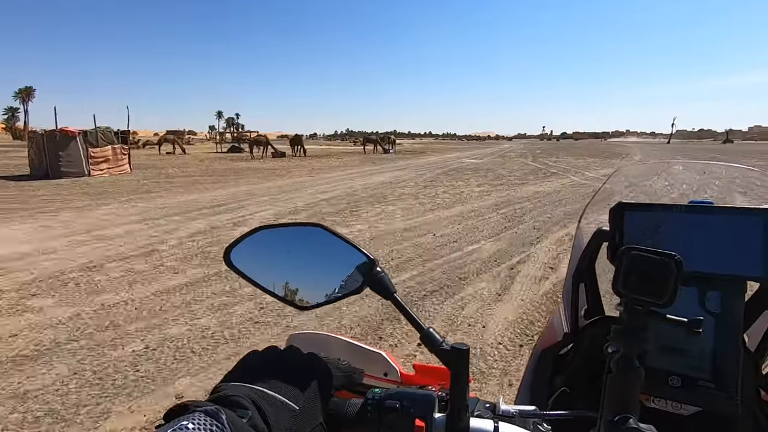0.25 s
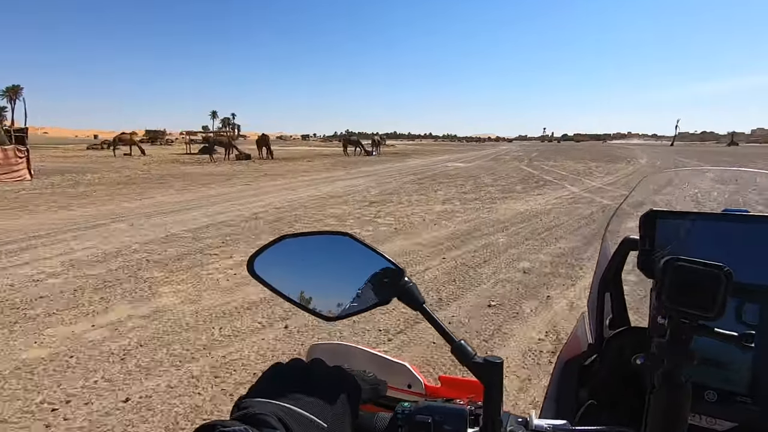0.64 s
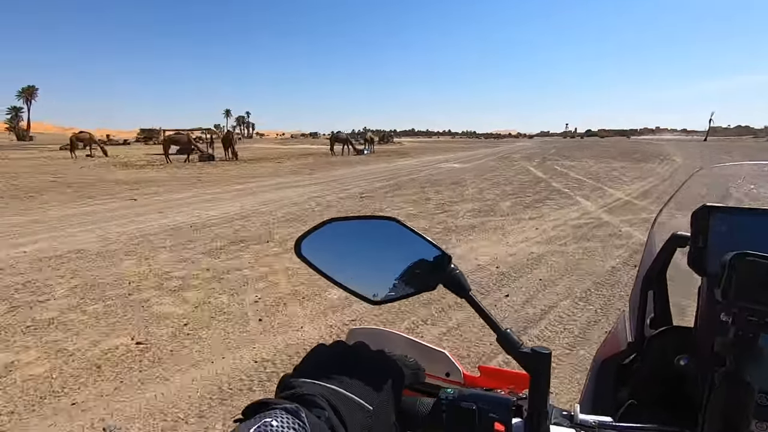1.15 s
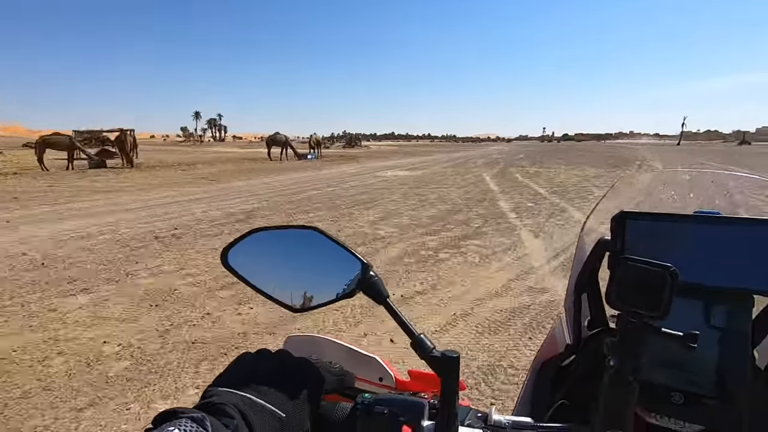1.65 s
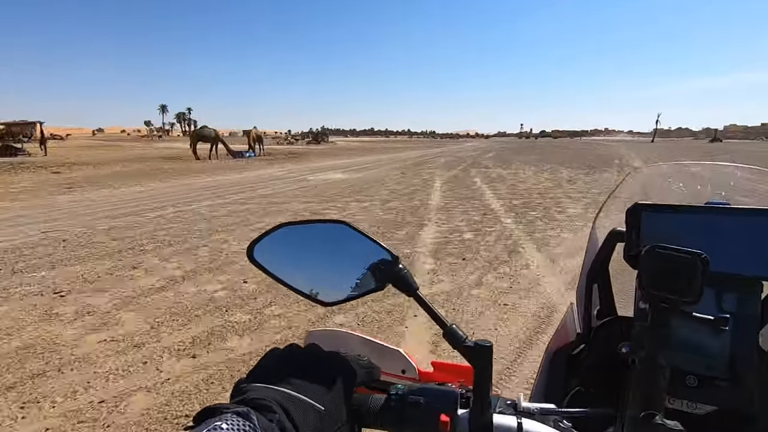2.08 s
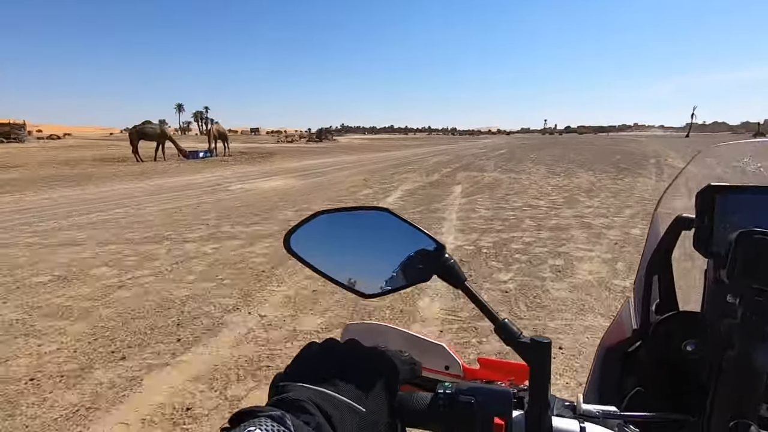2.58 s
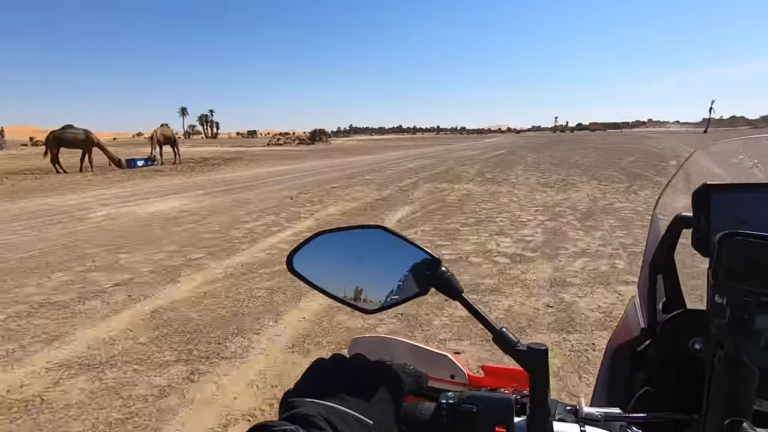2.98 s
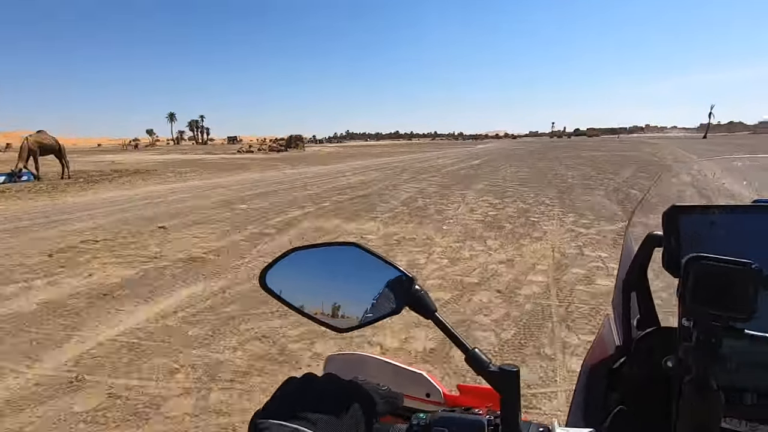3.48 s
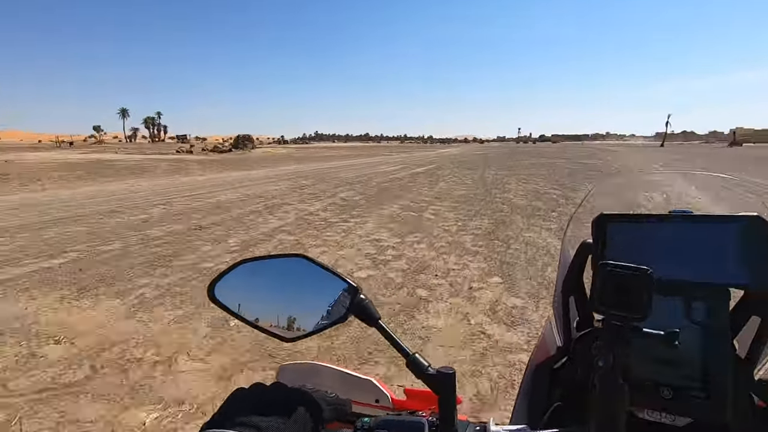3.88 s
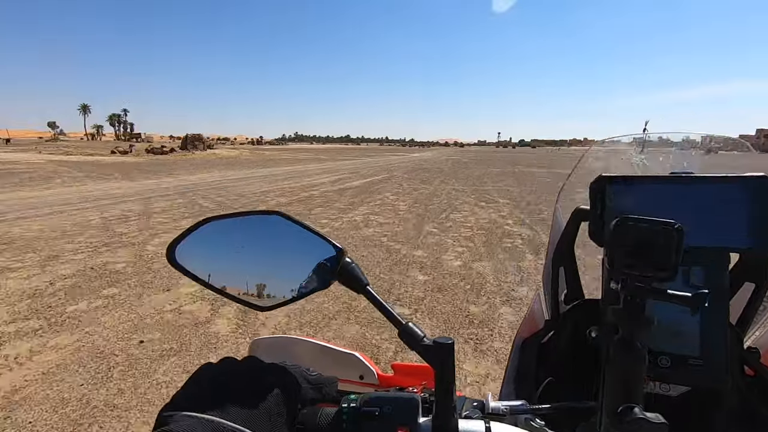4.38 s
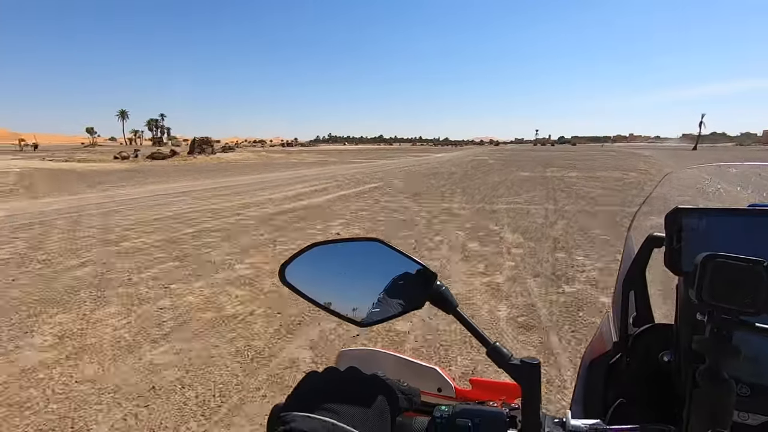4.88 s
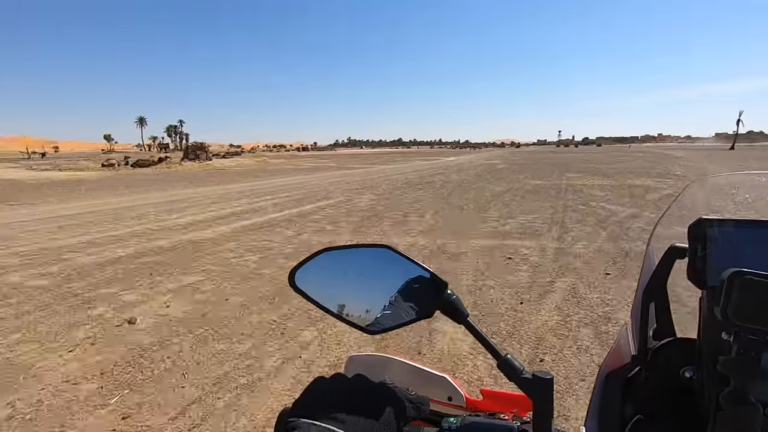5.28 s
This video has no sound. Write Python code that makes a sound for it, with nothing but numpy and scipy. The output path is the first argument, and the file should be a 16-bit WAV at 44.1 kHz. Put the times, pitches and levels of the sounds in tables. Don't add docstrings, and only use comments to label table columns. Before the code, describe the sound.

A motorcycle rides steadily over an open gravel plain, heard from the rider's helmet. Deep, buffeting wind dominates, with irregular soft thumps and a dull rush. Below it a twin-cylinder engine holds a low, slightly uneven drone, wavering in strength and sagging almost imperceptibly in pitch, with faint mechanical ticking. From 0 to 0.4 s a thin, very bright hiss lies over everything after a heavy opening buffet. Near 1 s a bright grit click is followed by fainter taps. Between 1.4 and 1.8 s stronger airy gusts hiss close to the ear, and a big low thump comes at 1.8 s. A light rut bumps at 2.1 s, with a dull tap; another follows at 2.6 s. About 3 to 4 s is calmer. At 4.25 to 4.35 s two quick knocks, the second hardest, rattle frame and helmet amid a hissing gust. Wind eases, then swells again from 5.3 s. Dry open air, no echo.

```python
import sys
import numpy as np
from scipy import signal
from scipy.io import wavfile

SR = 44100
rng = np.random.default_rng(int(sys.argv[2]) if len(sys.argv) > 2 else 0)


def voltage_ratio(level):
    return 10 ** (np.asarray(level, float) / 20)


def unload_audio(sound):
    columns = np.transpose(np.atleast_2d(sound))
    steps = np.round(np.clip(columns, -1, 1) * 32767)
    wavfile.write(sys.argv[1], SR, steps.astype(np.int16))


N = 244181
CONTROL_STEP = 64

# t/s, speed/rpm
CRANK_SPEED = [(0.0, 2056), (0.4, 2049), (0.79, 2041), (1.19, 2033), (1.58, 2039), (1.98, 2032),
               (2.37, 2025), (2.77, 2031), (3.17, 2026), (3.56, 2025), (3.96, 2026), (4.35, 2008),
               (4.75, 1984), (5.14, 1990), (5.54, 2001)]
# t/s, load level/dB (half its swing about the mean is heard)
ENGINE_LOAD = [(.1, -54), (.4, -28.5), (.66, -33), (.9, -29.5), (1.31, -41), (1.66, -33), (1.96, -43.5),
               (2.14, -30), (2.47, -30), (2.56, -34), (3.54, -33), (3.68, -35), (3.77, -30.5), (4.5, -31.5),
               (4.66, -37), (5.15, -33.5), (5.32, -46), (5.45, -32.5)]
# multiple of the four-stroke cycle, level/dB rms
EXHAUST_ORDERS = [(1, -40.3), (2, -41.3), (3, -40.1), (4, -51.9), (5, -33.5), (6, -41.2), (7, -50.3),
                  (8, -51.4), (11, -55.9), (13, -56.9), (14, -50.5), (16, -52.9), (22, -65.0), (26, -64.0),
                  (34, -65.5)]
PIPE_LAG = [(1, -.05), (2, -.05), (3, .3), (6, .3), (8, .05), (14, .14)]
# position/share of cycle, level/dB
KNOCKS = [(.135, 1), (.10, -4), (.33, -8), (.45, -5), (.53, -5), (.84, -7)]
# f/Hz, width/Hz, level/dB
CASING_MODES = [(1800, 140, 1.5), (2320, 220, -12), (2530, 64, -4), (2730, 57, 2.5), (2950, 59, 1),
                (3405, 130, -4), (4670, 520, -7.5), (6240, 1200, -9), (9000, 3000, -7.5)]
# f/Hz, level/dB per Hz
WIND_SPECTRUM = [(8, 1.5), (26, -2.5), (50, -9), (72, -9), (110, -14), (290, -22.5), (560, -29.5),
                 (720, -33.5), (1250, -35), (1800, -41.5), (2500, -51.5), (5000, -64), (9500, -67),
                 (15900, -87)]
# t/s, level/dB
AIRFLOW = [(0, 4), (.4, 1), (.95, -0.5), (1.6, 2), (1.9, 2), (2.3, -2.5), (2.6, 1), (3.0, -1.5), (4.0, 0),
           (4.2, 1.5), (4.3, 5), (4.42, 2.5), (4.85, -1.5), (5.1, 1), (5.54, 2)]
# f/Hz, share of the swing
AIRFLOW_SHARE = [(40, 0.58), (150, 0.97), (420, 0.48), (1300, 0.92), (9000, 1.01), (14000, .3)]
# t/s, level over the steady wind/dB, length/s, centre f/Hz
BUFFETS = [(0.007, 12, 0.18, 60), (0.416, 1, 0.024, 149), (0.597, 9.5, 0.18, 55), (.76, -1, .1, 40),
           (1.0, 1, 0.052, 40), (1.125, 5, 0.08, 44.8), (1.496, 5, .04, 60), (1.656, 5, 0.092, 55),
           (1.806, 12, 0.18, 43.7), (1.91, 4, 0.078, 150), (2.019, 10.5, 0.068, 35.5),
           (2.158, 7.5, 0.096, 280), (2.22, 4, .06, 30), (2.35, 2, .08, 40), (2.51, 11, 0.2, 25),
           (2.622, 5.5, 0.19, 35), (2.65, 4.5, .06, 400), (2.805, 1, 0.13, 44.7), (3.236, 8.5, 0.054, 40),
           (3.45, 7.5, 0.19, 45.5), (3.974, 9, 0.073, 40.3), (4.11, -4, 0.024, 150),
           (4.314, 12, 0.11, 40.4), (4.379, 9, 0.088, 170), (4.914, -3, .05, 148), (4.982, 7, 0.052, 35),
           (5.1, 8, 0.045, 45), (5.297, 7.5, 0.16, 130), (5.354, 2.5, 0.17, 600), (5.486, 3.5, 0.13, 150)]
# f/Hz, level/dB per Hz
WIDE_GAP = [(2400, -15), (3200, -3.5), (4000, -4), (4800, -2.5), (5300, -9), (6000, -34)]
MIDDLE_GAP = [(4800, -20), (5600, 1.5), (6300, 4), (7300, -4), (8000, -17), (9500, -29)]
NARROW_GAP = [(6200, -27), (7000, -4), (7600, -4), (8400, -12), (9200, -8), (10200, -3), (11200, -8),
              (12500, -2), (14000, -5.5), (15900, -12)]
LEAK_DB = [-66, -71, -74]
# t/s, wide gap level/dB, middle gap over it/dB, narrow gap over it/dB
GUSTS = [(.03, -62.5, -8, 2), (.125, -67, -4, 8), (.225, -65, 0, 9), (.27, -67, 0.1, 8),
         (.385, -73, -1, 2.1), (.51, -69, -7, 3), (1.06, -68, -5, -6), (1.22, -74, -8, 5),
         (1.385, -53, -5.5, -11), (1.51, -54, -1, -9), (1.55, -58, -1.1, -5), (1.615, -55, -4, -8),
         (1.645, -54, -6, -10.1), (1.79, -59, -14, -13), (1.99, -63.5, -2, -8), (2.12, -60, -1.1, -15),
         (2.42, -66, -7, -11), (2.62, -59, -29, -12), (2.73, -66, -7, -8), (4.11, -66, -14, -16),
         (4.25, -54.5, -5, -28), (4.345, -56, 0, -28), (4.375, -51.5, -11, -28), (5.35, -61, -15, -16),
         (5.48, -61, -4, -8)]
# start t/s, end t/s, level over the leak/dB
HEAD_TURNS = [
    (-.1, .42, 10),
    (1.37, 1.81, 6.5),
    (3.42, 3.72, 2.5),
]
TURN_OPENS = [0.29, 0.42, 1.05]
# t/s, peak level/dB, bright ring over the dull one/dB
GRIT = [
    (.9835, -47, 1),
    (1.0585, -54, -5),
    (1.137, -54, -14),
    (1.161, -55, -14),
    (1.175, -55, -14),
    (1.8005, -56, -3),
    (2.108, -52, -12),
    (2.621, -53, -10),
]
# f/Hz, width/Hz
GRIT_RINGS = [(5600, 3000), (13000, 3500)]
# t/s, level/dB rms, rise/s, fall/s
JOLTS = [
    (2.125, -33.5, 0.01, 0.017),
    (4.255, -29.5, 0.0064, 0.012),
    (4.331, -22.5, 0.011, 0.026),
]
# f/Hz, width/Hz, level/dB
BODY_MODES = [(119, 32, 0), (335, 95, 0), (680, 300, -7.5), (990, 330, -12.5), (1330, 340, -14)]
# f/Hz, width/Hz, level/dB
HOUSING = [(570, 97, 2.5), (1007, 99, -3.5), (1244, 73, -1), (3760, 140, -0.5), (4790, 300, 0),
           (5110, 330, -3.5), (6460, 760, 0), (7400, 570, -1.5), (10900, 880, 0), (13400, 1500, -6.5)]


def rms_one(x):
    return x / np.sqrt(np.mean(x ** 2) + 1e-20)


def in_time(rows):
    s, *columns = np.transpose(rows)
    return [np.interp(np.arange(N) / SR, s, column) for column in columns]


def at_log(points, x):
    places, values = np.transpose(points)
    return np.interp(np.log(x), np.log(places), values)


def every_sample(coarse):
    return np.interp(np.arange(N) / CONTROL_STEP, np.arange(len(coarse)), coarse)


def swell(s, rise, fall):
    t = np.arange(0, N, CONTROL_STEP) / SR - s
    return np.exp(-(t / np.where(t < 0, rise, fall)) ** 2)


def drift(rate_hz):
    r = np.exp(-80 * np.pi * rate_hz / SR)
    white = rng.standard_normal(N // 40 + 2002)
    slow = signal.lfilter([1], [1, -2 * r, r * r], white)[2000:]
    return np.interp(np.arange(N) / 40, np.arange(len(slow)), rms_one(slow))


def resonance(x, hz, width_hz):
    r = np.exp(-np.pi * width_hz / SR)
    feedback = [1, -2 * r * np.cos(2 * np.pi * hz / SR), r * r]
    return signal.lfilter(np.array([1, 0, -1]) * (1 - r * r) / 2, feedback, x)


def bands(spectrum, count):
    white = rng.standard_normal((2, N + SR // 2))
    edges = np.geomspace(spectrum[0][0], spectrum[-1][0], count + 1)
    for k, (low, high) in enumerate(zip(edges, edges[1:])):
        hz = np.sqrt(low * high)
        band_pass = signal.butter(2, [low, high], "band", fs=SR, output="sos")
        band = signal.sosfilt(band_pass, white[k % 2])[SR // 2:]
        yield hz, voltage_ratio(at_log(spectrum, hz)) * band


def drone(cycle):
    first_firing, firing_gap = .15, .375
    middle = first_firing + firing_gap / 2
    load_db = in_time(ENGINE_LOAD)[0]
    out = 0
    for k, level_db in EXHAUST_ORDERS:
        k = round(k)
        sign = np.sign(np.cos(np.pi * k * firing_gap) + 1e-3)
        wobble = .0018 * k * drift(4.0)
        turns = k * (cycle - middle) - at_log(PIPE_LAG, k) + wobble
        strength = np.sqrt(2) * voltage_ratio(level_db + 1.0 * drift(7.1))
        out = out + sign * strength * np.cos(2 * np.pi * turns)
    return out * voltage_ratio(.5 * (load_db - np.mean(load_db)))


def casing(cycle):
    gate = .35
    turns = int(cycle[-1]) + 2
    for share, level_db in KNOCKS:
        since = (cycle - share) % 1 / .015
        strength = voltage_ratio(level_db + 1.5 * rng.standard_normal(turns))
        gate = gate + strength[(cycle - share).astype(int)] * since * np.exp(1 - since)
    knocks = gate * rng.standard_normal(N)
    ring = 0
    for k, (hz, width_hz, db) in enumerate(CASING_MODES):
        mode = rms_one(resonance(knocks, hz, width_hz))
        ring = ring + voltage_ratio(db) * mode * (-1) ** k
    return voltage_ratio(-61) * rms_one(ring)


def wind():
    buffet_octaves = 0.87
    flow_db = in_time(AIRFLOW)[0]
    together = drift(34.0)
    lumps_db = 2.5 * drift(6.5)
    slaps_db = np.array([db * swell(s, length / 2, length / 2) for s, db, length, _ in BUFFETS])
    centres_hz = np.array(BUFFETS)[:, -1]
    out = 0
    for hz, band in bands(WIND_SPECTRUM, count=28):
        nearness = np.exp(-(np.log2(hz / centres_hz) / buffet_octaves) ** 2)
        gust_db = at_log(AIRFLOW_SHARE, hz) * flow_db + every_sample(nearness @ slaps_db)
        gust_db = gust_db + lumps_db / (1 + (hz / 120) ** 2)
        out = out + band * voltage_ratio(gust_db + 0.5 * together + 0.44 * drift(15.6))
    return voltage_ratio(-25) * rms_one(out)


def gap_flow():
    t = np.arange(0, N, CONTROL_STEP) / SR
    edge_s, gust_rise_s, gust_fall_s = .008, 0.019, 0.027
    turned_db = 0
    for start, end, db in HEAD_TURNS:
        begun = 1 + np.tanh((t - start) / edge_s)
        lasting = 1 - np.tanh((t - end) / edge_s)
        turned_db = turned_db + db / 4 * begun * lasting
    power = voltage_ratio(2 * (np.c_[LEAK_DB] + np.c_[TURN_OPENS] * turned_db))
    for s, db, middle_db, narrow_db in GUSTS:
        gust_db = db + np.array([[0], [middle_db], [narrow_db]])
        power = power + voltage_ratio(2 * gust_db) * swell(s, gust_rise_s, gust_fall_s)
    return [every_sample(10 * np.log10(p)) for p in power]


def hiss(spectrum, level_db):
    jet = sum(band * voltage_ratio(1.5 * drift(20.0)) for _, band in bands(spectrum, count=8))
    return rms_one(jet) * voltage_ratio(level_db + .8 * drift(40.0))


def gusts():
    wide_db, middle_db, narrow_db = gap_flow()
    wide = hiss(WIDE_GAP, wide_db - 3.5)
    middle = hiss(MIDDLE_GAP, middle_db - 4.0)
    narrow = hiss(NARROW_GAP, narrow_db + 0.5)
    return wide + middle + narrow


def grit():
    out, t = np.zeros(N), np.arange(400) / SR
    cracks = rng.standard_normal((len(GRIT), len(t))) * np.exp(-t / .0018)
    for (s, peak_db, bright_db), crack in zip(GRIT, cracks):
        dull, bright = (resonance(resonance(crack, *ring), *ring) for ring in GRIT_RINGS)
        tick = dull / np.abs(dull).max() + voltage_ratio(bright_db) * bright / np.abs(bright).max()
        out[round(s * SR):][:len(t)] += voltage_ratio(peak_db) * tick
    return out


def jolts():
    t, shake = np.arange(N) / SR, 0
    for s, level_db, rise, fall in JOLTS:
        since = np.maximum(t - s, 0)
        envelope = (1 - np.exp(-since / rise)) * np.exp(-(since / (2 * fall)) ** 2)
        shake = shake + voltage_ratio(level_db) * envelope
    rattle = shake * rng.standard_normal(N)
    body = []
    for hz, width_hz, db in BODY_MODES:
        evened = np.sqrt(SR / (np.pi * width_hz))
        body.append(voltage_ratio(db) * evened * resonance(rattle, hz, width_hz))
    return sum(body[::2]) - sum(body[1::2])


def scene():
    cycle = -.05 + 1 + np.cumsum(in_time(CRANK_SPEED)[0]) / (120 * SR)
    engine = drone(cycle) + casing(cycle)
    air = wind() + gusts()
    return (engine + air + grit() + jolts())[None]


def band_limit(x):
    return signal.sosfilt(signal.butter(12, 16050, fs=SR, output="sos"), x)


def record(dry):
    for hz, width_hz, level_db in HOUSING:
        dry = dry + (voltage_ratio(level_db) - 1) * resonance(dry, hz, width_hz)
    rounded = .45 * np.tanh(dry / .45)
    top_cut = signal.ellip(12, .5, 60, 15730, fs=SR, output="sos")
    mix = signal.sosfilt(top_cut, rounded)
    return band_limit(mix)


dry = scene()
out = record(dry)
unload_audio(out)
```